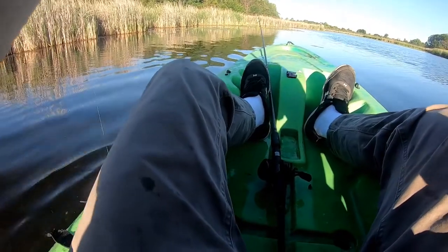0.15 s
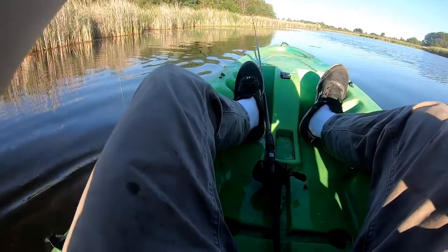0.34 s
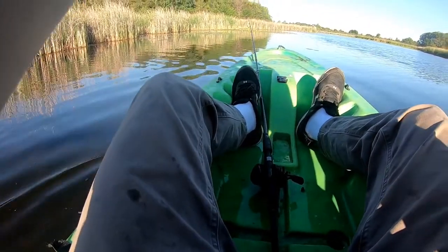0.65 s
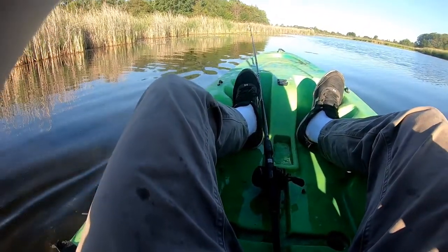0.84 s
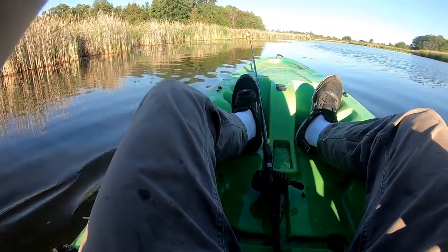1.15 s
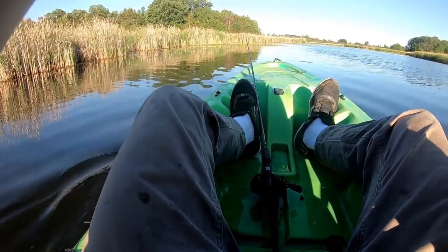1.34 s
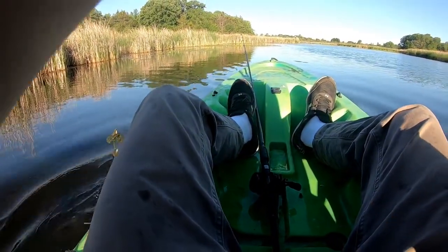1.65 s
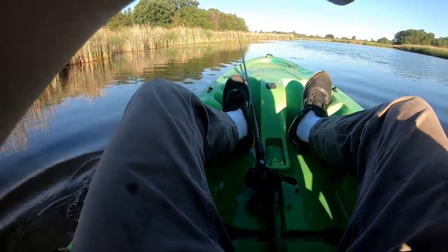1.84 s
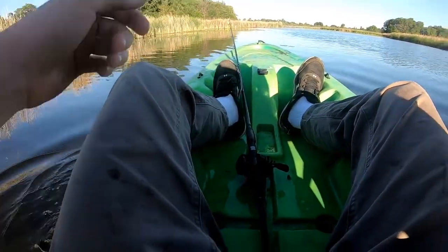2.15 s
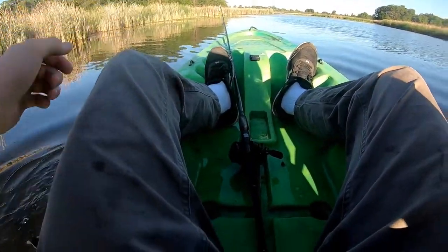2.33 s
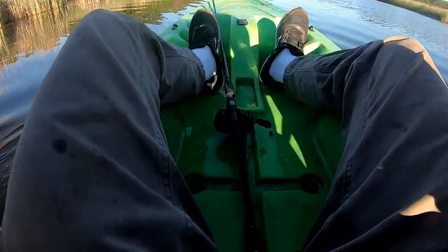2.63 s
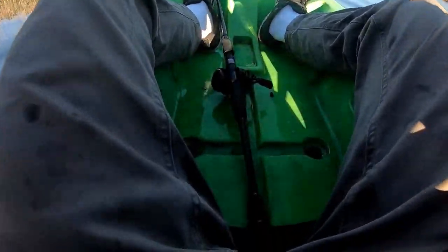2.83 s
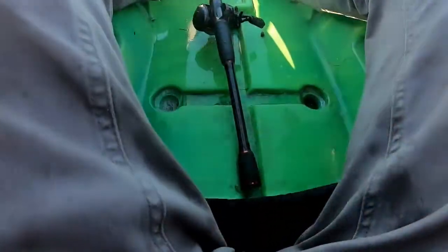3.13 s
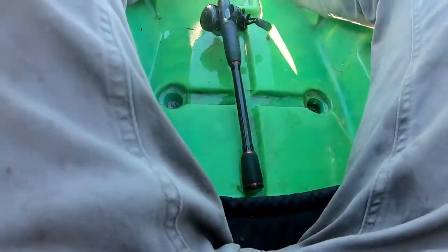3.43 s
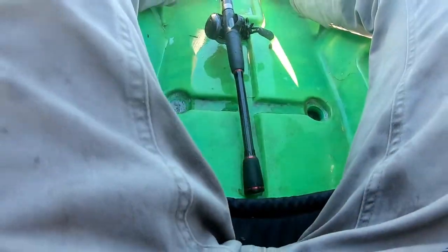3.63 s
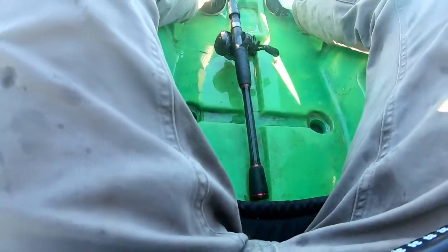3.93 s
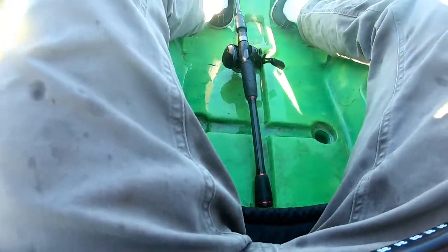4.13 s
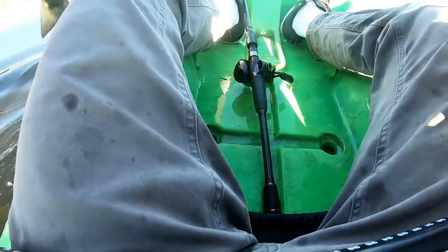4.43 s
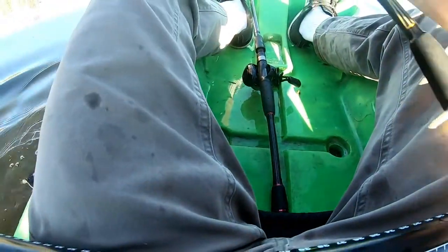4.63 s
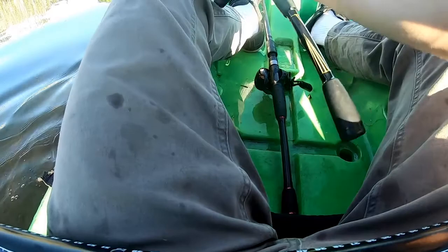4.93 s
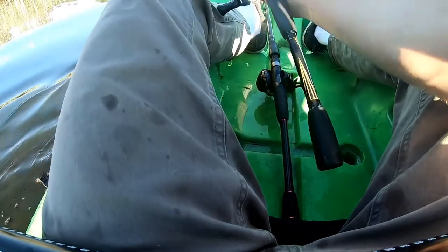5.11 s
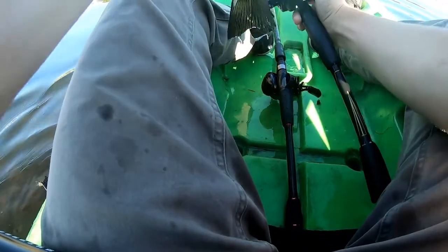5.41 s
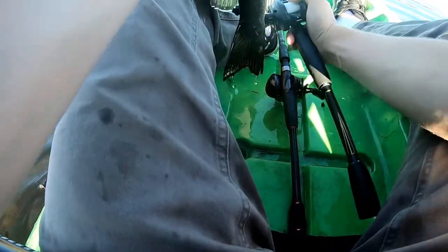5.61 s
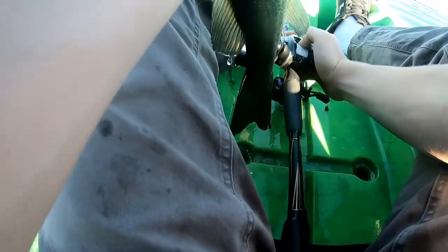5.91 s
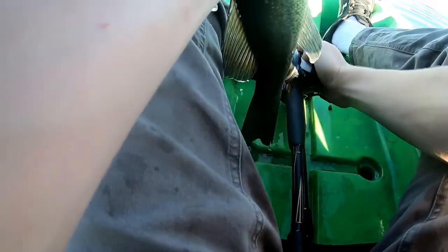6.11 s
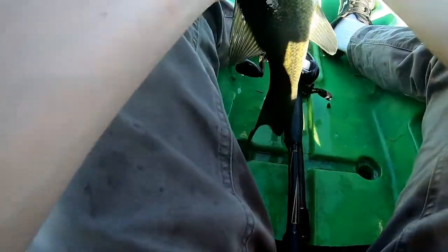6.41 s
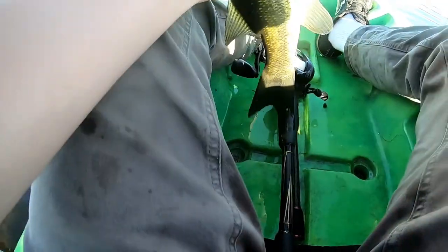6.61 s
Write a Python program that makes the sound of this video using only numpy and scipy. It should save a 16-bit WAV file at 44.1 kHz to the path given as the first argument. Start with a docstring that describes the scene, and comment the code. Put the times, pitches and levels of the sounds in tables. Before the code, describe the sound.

Close, slightly muffled outdoor sound inside a plastic kayak. Soft thumps lead to hollow hull knocks, rod clicks and plopping drips. It thins to small ticks, far chirps and cloth rubbing; a medium knock comes midway, then a clear slowing bird trill. Low gusty puffs lean right, another bird buzzes briefly, and the loudest double clatter booms through the hull, with a scrape after it.

```python
"""A low rumble and a murmuring hull come first, then hollow knocks: an angler fishes from a plastic kayak on a still
reed lake, wearing a small camera. Rods, feet and a fish set the hull's modes ringing; line and reel tick as short
noise cracks; drips are damped sliding tones. Wind and late hull boom, rubbing and scraping, a thin hiss and far
air are shaped noise, with slow pressure swings for low puffs and thumps. Whistled notes make a near bird trill
on the left, a second bird answer ahead and small birds chirp far off."""
import sys
import numpy as np
from scipy import signal
from scipy.fft import rfft, irfft, next_fast_len
from scipy.io import wavfile
from scipy.ndimage import uniform_filter1d, map_coordinates

SR = 44100
rng = np.random.default_rng(int(sys.argv[2]) if len(sys.argv) > 2 else 0)


def dump(signal):
    """Clip the signal to [-1, 1] and save it as 16-bit WAV at the path in sys.argv[1]."""
    limited = np.clip(np.atleast_2d(signal).T, -1, 1)
    pcm = np.round(limited * 32767).astype(np.int16)
    wavfile.write(sys.argv[1], SR, pcm)


N = 298116

# How alike broad noise is at the two microphone ports.
# Each row: frequency in Hz, left-right likeness (1 same, 0 unrelated, -1 opposite).
PORT_LIKENESS = [(60, 0.93), (150, 0.8), (380, 0.85), (950, -0.27), (2400, 0.18), (6000, 0.37),
                 (15000, -0.8)]


def amp(db):
    """Turns decibels into a plain gain."""
    return 10 ** (np.asarray(db) / 20)


def unit(x):
    """Scales a signal to an rms of 1."""
    return x / np.sqrt(np.mean(x ** 2) + 1e-20)


def along(points, hz):
    """Reads a curve of (Hz, value) points on a log frequency axis."""
    f, v = np.transpose(points)
    return np.interp(np.log(hz + 1), np.log(f + 1), v)


def curves(rows):
    """Gives one value per sample for each column after the time."""
    s, *cols = np.transpose(rows)
    return [np.interp(np.arange(N) / SR, s, c) for c in cols]


def wobble(rate):
    """Draws a smooth random curve with rate knots a second."""
    knots = rng.standard_normal(int(N * rate / SR) + 4)
    return map_coordinates(knots, [np.arange(N) * rate / SR])


def filtered(x, response):
    """Multiplies the spectrum of x by a complex response of frequency."""
    m = next_fast_len(x.shape[-1] + 8192)
    spectrum = rfft(x, m) * response(np.fft.rfftfreq(m, 1 / SR))
    return irfft(spectrum, m)[..., :x.shape[-1]]


def rush(spectrum, alike, patchy_db):
    """Makes shaped stereo noise with patches of random gain; the mean of left and right has rms 1."""
    z = signal.stft(rng.standard_normal((2, N)), nperseg=512)[2]
    field = uniform_filter1d(rng.standard_normal(z.shape[1:]), size=6, axis=0)
    field = uniform_filter1d(field, size=8, axis=1)
    pair = signal.istft(z * amp(patchy_db * unit(field)), nperseg=512)[1][:, :N]

    def mid_side(hz):
        turn = np.arccos(np.clip(along(alike, hz), -1, 1)) / 2
        return amp(along(spectrum, hz)) * [np.cos(turn), np.sin(turn)]

    mid, side = filtered(pair, mid_side)
    pair = np.array([mid + side, mid - side])
    return pair / np.sqrt(np.mean(pair.mean(0) ** 2))


def add(out, s, sound, pan_db):
    """Lays a mono or stereo sound into out at s seconds, leaning left by pan_db."""
    i = round(s * SR)
    sound = (sound * amp([[pan_db / 2], [-pan_db / 2]]))[:, :N - i]
    out[:, i:i + sound.shape[1]] += sound


def lake_air():
    """Far air and reeds: a steady bed of patchy noise."""
    # Each row: frequency in Hz, relative strength in dB.
    air_colour = [(200, -31), (300, 0), (450, -31), (650, 6), (1150, 6), (2100, -10), (3400, -13.5),
                  (4600, -14), (7800, -23.5), (9800, -22.5), (11000, -58), (13000, -120)]
    level_db = -60
    return amp(level_db) * rush(air_colour, PORT_LIKENESS, patchy_db=1.8)


def hiss():
    """A thin hiss high up: treble noise that swells and flutters."""
    # Each row: time in seconds, level in dB before the flutter.
    hiss_level = [(0, -66), (.2, -75), (.3, -87), (1.1, -92), (1.25, -86), (1.5, -91), (2.3, -86),
                  (2.5, -73.5), (2.85, -74.5), (2.95, -69), (3.25, -66), (3.4, -82), (3.8, -81.5),
                  (3.97, -67.5), (4.08, -70), (4.17, -55.5), (4.25, -58.5), (4.3, -69.5), (4.5, -70.5),
                  (4.9, -77.5), (5.45, -74), (5.6, -80.5), (6.1, -69), (6.35, -64), (6.55, -76.5),
                  (6.76, -80)]
    # Each row: frequency in Hz, relative strength in dB.
    hiss_colour = [(3500, -120), (4500, -20), (6500, -14), (7300, -5), (8000, 0), (8800, -6), (9700, -14),
                   (11000, -20), (12000, -25), (13300, -20), (15000, -32), (16000, -120)]
    level_db, = curves(hiss_level)
    flutter_db = 1.8 * wobble(35) + 1.4 * wobble(14)
    return amp(level_db + flutter_db) * rush(hiss_colour, PORT_LIKENESS, patchy_db=1.2)


def rumble_and_murmur():
    """Lumpy low rumble, wind buffeting and late hull boom, differs from port to port; the hull murmurs on."""
    # Each row: time in seconds, low rumble level in dB, hull murmur level in dB,
    # the rumble's left-over-right lean in dB.
    low_levels = [(0, -59, -43, 1), (.25, -46.5, -45.5, -5), (.45, -57.5, -53.5, -1),
                  (.9, -56.5, -52.5, -5), (1.15, -50.5, -50.5, 1), (1.4, -62, -56, 0), (2.3, -64, -55, -11),
                  (3.1, -59.5, -51.5, -4), (3.5, -60, -55.5, -7.5), (4.45, -60.5, -55.5, -4),
                  (4.75, -51, -52.5, -6), (4.92, -62, -51.5, -11), (5.3, -46, -47, -11),
                  (5.75, -51, -45.5, -24), (5.85, -57, -52.5, -20), (6.0, -44, -38.5, -7),
                  (6.1, -41, -42, -8), (6.3, -36.5, -43.5, -5), (6.47, -61.5, -49.5, -26),
                  (6.76, -53.5, -57, -2)]
    # Colour of the low rumble. Each row: frequency in Hz, relative strength in dB.
    rumble_colour = [(12, -9), (20, 5.5), (43, 2), (68, 9.5), (226, -18), (258, -14), (500, -42.5),
                     (650, -41), (1100, -120)]
    # Colour of the hull's murmur, kept up by water and weight.
    # Each row: frequency in Hz, relative strength in dB.
    murmur_colour = [(70, -120), (100, -10), (160, -1), (250, -5.5), (420, -12), (600, -16.5), (900, -120)]
    rumble_db, murmur_db, pan_db = curves(low_levels)
    lumps = amp(1.4 * np.array([wobble(11), wobble(31)]))  # one curve for each port
    noise = unit(lumps * rush(rumble_colour, [(30, 0.74)], patchy_db=-1.5))
    rumble = amp(rumble_db + np.array([pan_db, -pan_db]) / 2) * noise
    murmur = amp(murmur_db + 1.5 * wobble(25)) * rush(murmur_colour, PORT_LIKENESS, patchy_db=2.5)
    return rumble + murmur


def puffs_and_thumps():
    """Each is one slow swing of pressure and a weak rebound; a gust brings an uneven run of them."""
    # Single low puffs and thumps at a port.
    # Each row: start in seconds, peak in dB, swing rate in Hz, left-over-right lean in dB.
    single_swings = [(.23, -40, 93.5, -32), (0.377, -26.5, 99, -20.5), (1.328, -46, 45.8, -21),
                     (1.849, -32, 106, -15.5), (2.038, -44, 37, -10), (2.391, -32.5, 60, -3),
                     (2.78, -49, 40, -12), (4.505, -36.5, 36, 18), (4.646, -37.5, 87, -27),
                     (4.812, -36.5, 89, 19), (4.854, -24, 111, -19), (5.356, -35, 64, -22),
                     (5.442, -26.5, 95, -23)]
    # The gust's run of puffs: these are middle values, each puff strays from them.
    gust_s, gap_s, count = 5.01, .056, 12
    gust_db, gust_hz, gust_pan_db = -33.5, 59.8, -20  # leaning to the right port
    out = np.zeros((2, N))
    run = [(gust_s + gap_s * (k + 0.195 * a), gust_db + 0.64 * b,
            gust_hz * np.exp(0.4 * c), gust_pan_db + 4 * d)
           for k, (a, b, c, d) in enumerate(rng.standard_normal((count, 4)))]
    for s, db, hz, pan_db in single_swings + run:
        cycles = np.arange(round(3 * SR / hz)) * hz / SR
        swell = 3.73 * cycles * np.exp(-cycles / 0.46)
        add(out, s, amp(db) * np.sin(2 * np.pi * cycles) * swell, pan_db)
    return out


def rubs_and_scrape():
    """Cloth rubs and something scrapes the hull after a knock, in uneven strokes of noise."""
    # Each row: time in seconds, level of rubbing or scraping in dB before the unevenness.
    rub_level = [(0, -66), (.3, -70), (.55, -75), (.75, -64), (.88, -74), (1.15, -65), (1.38, -65),
                 (1.5, -74), (2.3, -77), (2.45, -65), (3.2, -58), (3.37, -63), (3.43, -78), (3.8, -74),
                 (3.9, -63), (4.155, -61), (4.175, -52), (4.32, -54), (4.42, -60), (4.72, -66), (5.15, -66),
                 (5.48, -59), (5.6, -65), (6.35, -58), (6.55, -74), (6.76, -74)]
    # Each row: frequency in Hz, relative strength in dB.
    rub_colour = [(500, -120), (800, -18), (1400, -2.5), (2000, -6), (2600, -12), (3600, -12.5),
                  (5000, -16), (6500, -23), (9500, -25), (11000, -39), (13000, -120)]
    rub_db, = curves(rub_level)
    stroke = amp(rub_db + 1.5 * wobble(30) + 1.5 * wobble(6))
    return stroke * rush(rub_colour, PORT_LIKENESS, patchy_db=1.5)


def whistles(notes, pan_db, lead, wet_db):
    """Gliding whistles with soft edges, left ahead by lead radians; reeds and water scatter a short echo."""
    out = np.zeros((2, N))
    for s, length, hz0, hz1, db in notes:
        t = np.arange(round((length + .004) * SR)) / SR  # room for the soft edges
        edge = np.clip(np.minimum(t, t[-1] - t) / .003, 0, 1) ** 2
        hz = hz0 + (hz1 - hz0) * t / t[-1]
        phase = 2 * np.pi * np.cumsum(hz) / SR + rng.uniform(0, 2 * np.pi)
        tone = np.sin([phase + lead / 2, phase - lead / 2])
        add(out, s - .002, amp(db + 3) * edge * tone, pan_db)  # +3 dB: a sine's peak from its rms
    t = np.arange(SR // 2) / SR
    tail = rng.standard_normal((2, len(t))) * amp(-60 * t / .5)
    tail /= np.linalg.norm(tail[0])
    return out + amp(wet_db) * signal.fftconvolve(out, tail, axes=1)[:, :N]


def far_birds():
    """Small birds far off give short gliding chirps."""
    # Each row: start in seconds, length in seconds, start pitch in Hz, end pitch in Hz, rms level in dB.
    chirps = [(.405, 0.013, 4570, 3850, -68.5), (.805, 0.018, 3630, 3300, -67.5),
              (1.345, 0.031, 7960, 5700, -73), (1.385, .02, 5300, 5300, -74),
              (1.685, 0.027, 3500, 4650, -73), (1.71, 0.027, 4700, 5150, -82),
              (1.812, 0.02, 4180, 3340, -67), (1.94, .016, 5300, 4600, -72),
              (1.956, 0.036, 4720, 5800, -74), (2.045, .027, 4600, 3460, -71),
              (2.078, .014, 4700, 5500, -75), (2.172, .018, 5800, 4830, -77),
              (2.11, 0.0122, 4900, 4100, -68), (2.19, 0.013, 4800, 4720, -71),
              (5.78, 0.016, 5200, 6130, -69), (5.805, 0.0192, 6090, 4700, -68),
              (6.58, 0.044, 2920, 5000, -71), (6.605, 0.037, 6600, 5270, -72),
              (6.67, 0.039, 4000, 5000, -64), (6.685, 0.016, 6040, 4870, -66),
              (6.705, 0.016, 4160, 3480, -61.5)]
    return whistles(chirps, pan_db=-5.0, lead=0.32, wet_db=-33.0)


def answering_bird():
    """A second bird answers in even pulses that begin higher and weaker, then settle."""
    # Notes after the pulses.
    # Each row: start in seconds, length in seconds, start pitch in Hz, end pitch in Hz, rms level in dB.
    last_notes = [(6.134, .006, 3200, 3200, -52), (6.151, .025, 3170, 3290, -48),
                  (6.176, .03, 3290, 3260, -48)]
    start_s, period_s, count, pulse_s = 5.8525, .02145, 11, 0.0072
    settled_hz, drop_hz, settled_db = 3266, 130, -43
    # The first pulse has the whole extra pitch and loss of level; each next keeps this share of them.
    high_hz, shy_db, kept_share = 260, 3.5, 0.76
    pulses = []
    for k, fresh in enumerate(kept_share ** np.arange(count)):
        hz0 = settled_hz + high_hz * fresh
        hz1 = settled_hz - drop_hz + 0.44 * high_hz * fresh * (k > 0)  # the first sweeps wider
        db = settled_db - shy_db * fresh + rng.normal(0, 1.4)
        pulses.append((start_s + k * period_s, pulse_s, hz0, hz1, db))
    return whistles(pulses + last_notes, pan_db=.5, lead=-.2, wet_db=-13)


def near_bird():
    """The trill slows down; the second side of the throat fills each gap with a high up-and-down chirp."""
    # Notes around the trill.
    # Each row: start in seconds, length in seconds, start pitch in Hz, end pitch in Hz, rms level in dB.
    extra_notes = [(3.851, .008, 2600, 2650, -46), (3.862, .012, 2600, 2600, -54),
                   (3.882, .012, 2750, 2600, -51), (3.962, .008, 3650, 3450, -46),
                   (3.975, .005, 3700, 3700, -51), (3.985, .006, 2700, 2700, -49),
                   (3.968, .012, 5000, 4700, -49), (3.983, .006, 5100, 4700, -50),
                   (3.993, .006, 5100, 4800, -51), (4.422, .115, 3260, 3240, -52),
                   (4.422, .06, 4880, 4850, -50), (4.482, .065, 4850, 4830, -58)]
    # The trill's course, from which single pulses stray. Each row: time in seconds, pitch in Hz, rms level in dB.
    trill_course = [(4.0, 2730, -42), (4.05, 2705, -39), (4.17, 2678, -37.5), (4.3, 2645, -38.5),
                    (4.4, 2625, -40), (4.425, 2625, -52)]
    trill_s, count = 3.9987, 17
    first_period_s, last_period_s, slowing = .0155, .037, .92  # the period creeps toward the last value
    overtone_db, tail_db = -17, -19  # the trill's octave; the falling end of each high chirp
    low, high = [], []
    when, pitch, level = np.transpose(trill_course)
    period = last_period_s - (last_period_s - first_period_s) * slowing ** np.arange(count)
    starts = trill_s + np.cumsum(period) - period
    for s, step in zip(starts, period):
        length = .75 * step - .005
        hz, db = np.interp(s, when, pitch), np.interp(s, when, level)
        low.append((s - .0005, length + .0015, hz + rng.normal(25, 15), hz - 20, db + rng.normal(0, .8)))
        db += rng.normal(0, 1.5)
        start, gap = s + length, step - length
        if s + step < when[-1]:
            high += [(start + 0.00088, 0.43 * gap, 4800, 5450, db - 4.0),
                     (start + 0.31 * gap, 0.41 * gap, 5300, 4200, db - 8.5),
                     (start + 0.53 * gap, 0.47 * gap, 4200, 3100, db + tail_db + rng.normal(0, 4)),
                     (s + step, 0.41 * length, 2 * hz, 2 * hz - 60, db + overtone_db)]
    trill = whistles(low, pan_db=9.5, lead=-.9, wet_db=-9)
    gap_chirps = whistles(high, pan_db=.5, lead=2.2, wet_db=-7)
    return trill + gap_chirps + whistles(extra_notes, pan_db=5, lead=-.8, wet_db=-14)


def drips():
    """A trapped bubble rings as a damped tone whose pitch slides; higher bubbles die sooner."""
    # Drips and bubbles. Each row: start in seconds, level in dB, start pitch in Hz,
    # end pitch over start pitch, left-over-right lean in dB.
    bubbles = [(.514, -45.5, 1430, 1.3, 4), (.59, -33, 847, 0.99, 4), (.618, -32, 780, 1.1, 4),
               (.647, -27, 946, 0.92, 2), (0.711, -36.5, 1600, 0.9, 4), (.728, -38, 920, 1.03, 0),
               (.90, -50.5, 1570, 1.18, 16), (.928, -42.5, 946, 0.76, 4), (1.038, -34, 473, 1.15, -2),
               (1.065, -43.5, 422, 1.04, -2), (1.086, -40.5, 1770, 1.03, -6), (1.165, -38, 1940, 0.95, -3),
               (1.287, -37.5, 1706, 1.03, 0), (1.297, -40, 1760, 0.99, -4), (1.345, -44, 2850, 1.08, 0),
               (1.388, -55, 2550, 1.17, 0), (1.40, -47, 690, 1.32, 2), (1.505, -35.5, 757, 1, 1),
               (1.937, -36.5, 605, 1.42, -2), (3.21, -42, 1630, 1.13, 9), (3.372, -45.5, 1650, 1, 10),
               (3.69, -49, 1670, 0.94, 8), (3.839, -45.5, 1630, 1, 7), (5.022, -45, 1500, 1.15, -12),
               (6.499, -46.5, 1380, 1.1, 1)]
    cycles_at_800_hz = 47.5  # cycles to fall 60 dB
    out, t = np.zeros((2, N)), np.arange(SR // 5) / SR
    for s, db, hz0, slide, pan_db in bubbles:
        hz1 = hz0 * slide
        t60 = cycles_at_800_hz / hz0 * (800 / hz0) ** 0.16
        hz = hz1 + (hz0 - hz1) * np.exp(-t / (.15 * t60))
        phase = 2 * np.pi * np.cumsum(hz) / SR
        swell = (1 - np.exp(-t / .0015)) * amp(db - 60 * (t / t60) ** 1.5)
        add(out, s, swell * np.sin([phase + 0.088, phase - .9]), pan_db)  # the ports hear it out of step
    return out


def faint_ticks():
    """Rows of weak ticks of line and droplets at chance moments."""
    # Each row: start of a span in seconds, its end in seconds.
    spans = [(.85, 1.5), (3.3, 3.4), (4.9, 6.55)]
    mean_gap_s, middle_db, slot_s = 0.12, -53.5, .05
    slots = np.concatenate([np.arange(a, b, slot_s) for a, b in spans])
    u = rng.random((len(slots), 6))
    return [(s + 0.072 * a, middle_db + 9 * (b - .5), 2000 + 3000 * c, -30 * d, 22 * (e - .6))
            for s, (p, a, b, c, d, e) in zip(slots, u) if p < slot_s / mean_gap_s]


def resonance(hz, at, wide):
    """The response of one resonance at a centre pitch, with its width in Hz."""
    return 1j * hz * wide / (at ** 2 - hz ** 2 + 1j * hz * wide)


def ticks():
    """A short noise crack, unlike at the two ports, then the shell's dense ring, noise dying by band."""
    # Hard contacts of rod, reel and line. Each row: start in seconds, level in dB, centre pitch in Hz,
    # strength of the treble part in dB, left-over-right lean in dB.
    contacts = [(0.55, -44, 2020, -32, 1), (0.5883, -28, 2160, -23, 6), (.568, -55, 6500, -5, -2),
                (0.607, -45, 6500, -10, 0), (.611, -51, 3700, -30, 1), (0.6202, -49, 6000, -20, 5),
                (.638, -43, 2300, -30, 3), (0.646, -27.5, 3600, -28, 1.5), (0.655, -20.5, 2910, -41, -3.5),
                (0.71, -37.5, 3470, -13, 0.5), (0.7285, -27, 5240, -9, -0.5), (0.745, -35.5, 2200, 8, 3),
                (.753, -42, 6000, -6, 0), (0.8896, -50, 2800, -27, -2), (0.927, -57, 3970, -32, 0),
                (.949, -57, 2600, -27, 3), (1.044, -49, 4070, -30, -4), (1.0844, -43, 2060, -1, -7),
                (1.097, -34, 3300, 5, -4.5), (1.1636, -32, 1860, -29, -3), (1.176, -40, 3370, 12, 7),
                (1.2862, -40, 3150, -2, 0), (1.2969, -41.5, 1980, -42, -14), (1.435, -57, 8000, -20, 0),
                (1.506, -49.5, 2590, -30, 7), (1.5394, -41.5, 2120, -21, 2), (1.523, -45, 3020, -23, -2),
                (1.614, -64, 2620, -25, 3), (1.705, -53.5, 3300, -9, -3), (1.79, -52, 8800, -20, 0),
                (1.8082, -41, 4670, -1, -1.5), (1.945, -48, 7800, -10, -1), (2.065, -53, 7600, -14, -9),
                (2.14, -51, 7360, -17, -5), (2.235, -55, 7800, -30, -3), (2.3, -51, 7800, -30, -1),
                (2.36, -59, 7700, -30, -2), (2.43, -53, 7500, -30, 0), (2.4604, -39.5, 3200, -42, 5),
                (2.538, -44.5, 4200, -22, -3), (2.63, -49, 7400, -25, -6), (2.722, -48, 7700, -25, -2),
                (2.753, -48, 7860, -25, -2), (3.026, -42.5, 6400, -8, -11), (3.152, -40, 2820, -7.5, -7),
                (3.179, -25, 5140, -1.5, 6), (3.1976, -34, 3410, 7, -1), (3.2967, -41.5, 2110, -26, 10),
                (3.3282, -41.5, 2820, -9, 5), (3.3632, -45, 4440, -24, 5), (3.379, -44.5, 8800, -12, 1),
                (4.101, -45, 1800, -12, -3), (4.173, -41, 1500, -22, 4), (4.4742, -44, 3200, -11, -13),
                (4.6705, -43, 2650, -6, -9), (4.8475, -29, 1820, -24.5, 0), (5.42, -37.5, 2110, -6, -3),
                (5.6794, -47, 3400, -11, -5), (6.0734, -15, 2900, -26, -8.5), (6.0755, -21.5, 2570, -33, 9),
                (6.093, -25.5, 2720, -48, 5), (6.102, -23.5, 2750, -46, -7), (6.11, -26.5, 2000, -46, 0),
                (6.126, -34.5, 1810, -46, 6), (6.2029, -17.5, 2870, -60, -0.5),
                (6.2062, -25, 2400, -41, -1), (6.216, -33, 2550, -49, -11), (6.4011, -39.5, 2751, -10, -5),
                (6.4428, -43.5, 2165, -9, -3), (6.4975, -38, 1990, -23.5, -2)]
    # The shell's dense upper modes.
    # Each row: frequency in Hz, relative level in dB, seconds to fall 60 dB.
    shell_modes = [(590, 2.5, 0.051), (1090, -6, 0.12), (2540, -26.5, 0.33), (4000, -13.5, 0.026),
                   (5300, -25, 0.065), (9900, -50, 0.19)]
    low_db = -2  # the dull part of a crack
    shell_db, rings_per_db = -5, 0.24  # shell ring for a -15.5 dB tick; a harder contact rings it more
    out, t = np.zeros((2, N)), np.arange(SR // 10) / SR
    shell_hz, level_db, decay = np.transpose(shell_modes)
    for s, db, hz0, treble_db, pan_db in contacts + faint_ticks():
        a, b = rng.standard_normal((2, len(t))) * amp(-60 * t / 0.018) * (1 - np.exp(-t / 0.00021))
        a[0] += 4.5  # the instant of contact

        def band(hz):
            dull = amp(low_db) * resonance(hz, 1030, 570)
            treble = amp(treble_db) * resonance(hz, 12200, 9700)
            return resonance(hz, hz0, 0.28 * hz0) - dull - treble

        crack = filtered(np.array([a + 0.81 * b, a - 0.42 * b]), band)
        hz, frame, z = signal.stft(rng.standard_normal((2, len(t))), SR, nperseg=128)
        start_db = np.interp(hz, shell_hz, level_db, left=-40)[:, None]
        shape_db = start_db - 60 * frame / np.interp(hz, shell_hz, decay)[:, None]
        shell = signal.istft(z * amp(shape_db), SR, nperseg=128)[1][:, :len(t)]
        shell = np.array([shell[0] + .5 * shell[1], shell[0] - .5 * shell[1]])
        ring_gain = amp(shell_db + rings_per_db * (db + 15.5))
        tick = crack / np.abs(crack).max() + ring_gain * shell / np.abs(shell).max()
        add(out, s, amp(db) * tick, pan_db)
    return out


def blows():
    """Each blow dents the wall and rings the hull's modes near its own centre; each mode is a rough pair."""
    # Each row: start in seconds, peak in dB before the ports colour it, centre of the driven modes in Hz,
    # their spread in octaves, ring time factor, left-over-right lean in dB.
    hull_blows = [(0.106, -34.5, 236, 0.46, 1.5, 3), (.273, -23, 170, 0.43, 0.14, 0.5),
                  (0.282, -29, 246, 1.1, 0.49, -1.5), (0.299, -20.5, 193, 0.94, 0.82, -0.5),
                  (.655, -26, 930, 0.83, 1.6, -0.5), (.659, -17.5, 453, 0.32, 0.79, -1.5),
                  (.666, -15, 282, 0.91, 1, -1), (0.673, -10, 148.5, 0.23, 0.92, -0.5),
                  (.682, -22.5, 710, 0.91, 0.34, -6), (.712, -14.5, 154, 0.77, 0.85, -0.5),
                  (0.74, -16.5, 146, 0.52, 0.37, 0), (.722, -21.5, 303, 0.64, 0.51, 1),
                  (0.789, -23.5, 138, 0.47, 1.5, 0), (.992, -40, 502, .5, 0.73, -6),
                  (1.045, -39, 505, 0.55, 0.56, 1), (2.38, -29.5, 205, 0.68, 0.48, -1),
                  (2.406, -29.5, 114, 0.42, 0.79, 3.5), (2.459, -27.5, 824, 1.2, 0.17, 5),
                  (2.464, -31.5, 188, 0.88, 0.28, -8), (3.154, -31, 820, 0.46, 0.42, 5),
                  (3.174, -29.5, 716, 1.1, 0.2, -10), (3.179, -13.5, 262, 0.42, 0.53, 1),
                  (3.196, -25, 420, 0.53, 0.63, -2), (3.209, -27, 305, 0.41, 1.5, -1),
                  (3.235, -35.5, 700, 0.84, .6, 0), (3.258, -43, 330, 0.61, 0.71, 0),
                  (3.298, -37, 294, 0.62, 0.92, -1), (3.312, -33.5, 245, 0.44, 1.4, 2),
                  (4.175, -37.5, 336, 0.65, 1.7, 1.5), (4.848, -34, 395, 0.51, 0.15, -21.5),
                  (5.111, -37.5, 143, .7, 0.66, -13), (5.415, -32, 209, 1.1, 0.42, -4),
                  (5.52, -44.5, 240, 0.47, 0.48, -19), (5.678, -28, 274, 1.1, 0.29, -2),
                  (5.892, -36.5, 272, 1.1, 0.37, -5.5), (5.994, -26, 230, 1.2, 0.64, 2),
                  (6.074, -6, 365, 1.06, 0.57, -2), (6.085, -12, 113.7, 0.83, 1.5, 0),
                  (6.103, -12.5, 466, 1.37, 0.84, 0), (6.122, -17.5, 312, 0.84, 0.73, -2),
                  (6.149, -19, 161, 0.38, .9, -0.5), (6.204, -10, 437, 1.05, 1.14, -1.5),
                  (6.223, -19, 214, 0.27, 1.95, -1.5), (6.258, -18, 144, 0.61, 0.91, -1.5),
                  (6.457, -32.5, 270, 0.48, 0.34, -2)]
    # The hull's modes.
    # Each row: frequency in Hz, relative level in dB, seconds to fall 60 dB before the ring time factor.
    hull_modes = [(110.7, -2, 0.35), (136.5, -1.5, 0.36), (159.3, -1.5, 0.31), (223.6, -2, 0.41),
                  (278, -2.5, 0.31), (327.7, -4, 0.33), (371.2, -3.5, 0.27), (436, 1, 0.38),
                  (488.6, -4.5, 0.42), (587, -15.5, 0.18), (618, -4.5, 0.32), (698, -1, 0.09),
                  (821, -5, 0.36), (887, -1.5, 0.13), (965, -12.5, 0.52), (972, -20.5, 0.31),
                  (1262, -3.5, 0.24), (1545, -9, 0.22)]
    rise_cycles = 0.2  # a duller blow presses longer
    # The dented wall swings at the blow's own pitch for a few cycles.
    dent_db, dent_rise_cycles, dent_cycles = -1, 0.81, 1.63
    out, t = np.zeros((2, N)), np.arange(SR // 3) / SR
    hz, mode_db, t60 = np.transpose(hull_modes)[:, :, None]
    for s, db, centre_hz, spread, ring_factor, pan_db in hull_blows:
        chance = rng.standard_normal((4, len(hull_modes), 1))
        drive_db = -10 * (np.log2(hz / centre_hz) / spread) ** 2 + 2.3 * chance[0]
        first = np.sin(2 * np.pi * hz * (1 + 0.0064 * chance[1]) * t)
        second = 0.44 * np.sin(2 * np.pi * hz * (1 + 0.017 * chance[2]) * t + chance[3])
        fade = amp(mode_db + drive_db - 60 * t / (t60 * ring_factor))
        ring = np.sum(fade * (first + second), axis=0) * (1 + 1.34 * np.exp(-t / 0.04))
        cycles = t * centre_hz
        dent = np.sin(2 * np.pi * cycles) * np.exp(-cycles / dent_cycles)
        dent *= 1 - np.exp(-cycles / dent_rise_cycles)
        body = ring / np.abs(ring).max() + amp(dent_db) * dent
        body *= 1 - np.exp(-cycles / rise_cycles)
        add(out, s, amp(db) * body / np.abs(body).max(), pan_db)
    return out


def through_ports(knocks):
    """The microphone ports colour the knocks, and the camera's case puts the ports out of step."""
    # Each row: frequency in Hz, gain in dB.
    port_gain = [(20, -6), (60, -4), (5000, 6), (9000, 3.5), (11000, -11.5), (15000, -24.5)]
    # Each row: frequency in Hz, how far the left port leads in radians.
    left_lead = [(60, -0.5), (120, -1.5), (600, 0), (860, 1.5), (1120, 1.5), (1500, 1), (1900, 1.73),
                 (4500, -1.5), (7000, 4.5), (8000, 3), (15000, 0)]

    def response(hz):
        return amp(along(port_gain, hz)) * np.exp(.5j * along(left_lead, hz) * [[1], [-1]])

    return filtered(knocks, response)


def scene():
    """Adds all sources; only blows and ticks pass through the port colouring."""
    background = lake_air() + hiss() + rumble_and_murmur() + puffs_and_thumps() + rubs_and_scrape()
    birds = far_birds() + answering_bird() + near_bird()
    return background + birds + drips() + through_ports(ticks() + blows())


def record(dry):
    """The camera keeps nothing above its band limit."""
    top_hz = 15700
    return filtered(dry, lambda hz: hz < top_hz)


dry = scene()
out = record(dry)
dump(out)
```